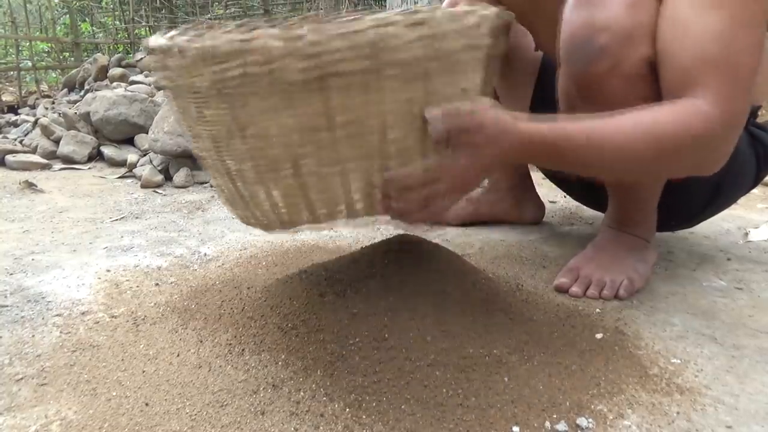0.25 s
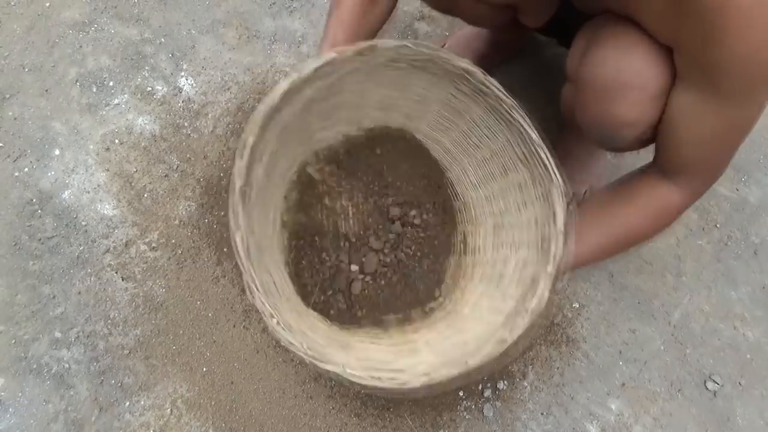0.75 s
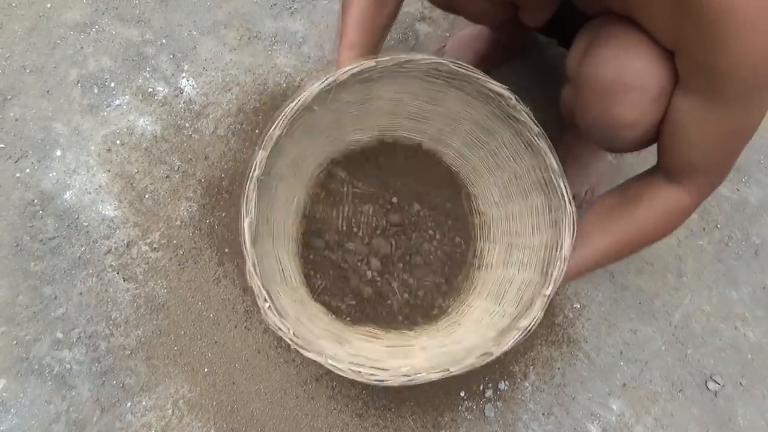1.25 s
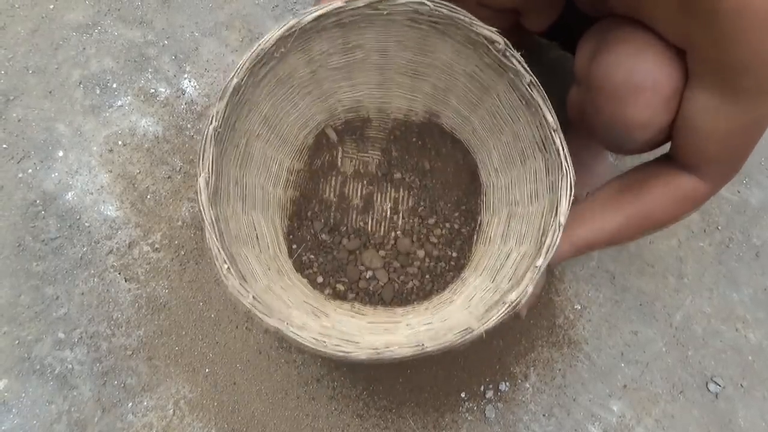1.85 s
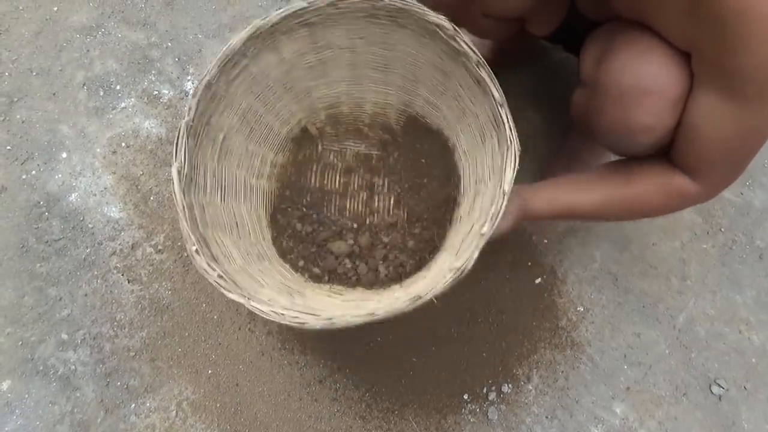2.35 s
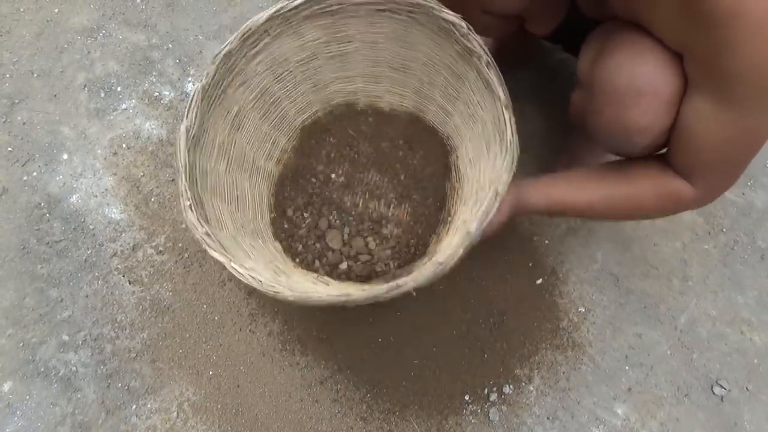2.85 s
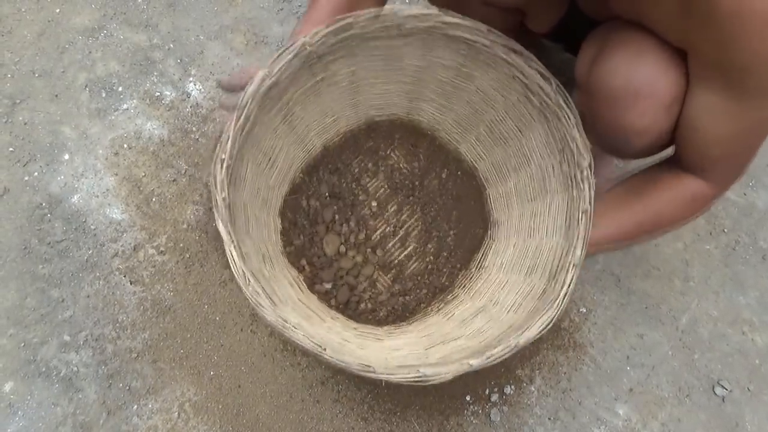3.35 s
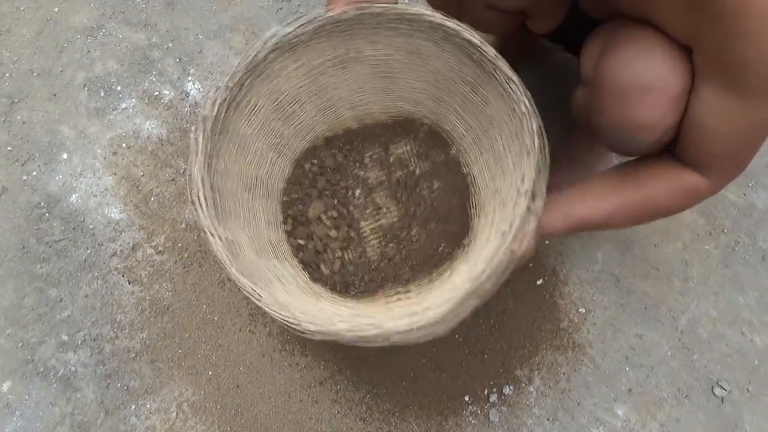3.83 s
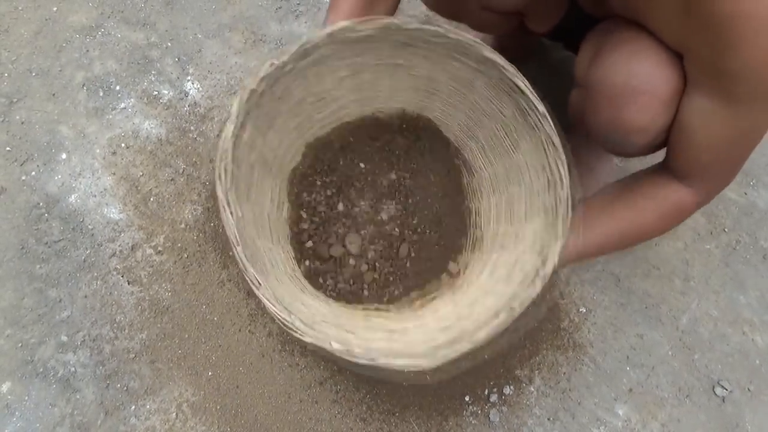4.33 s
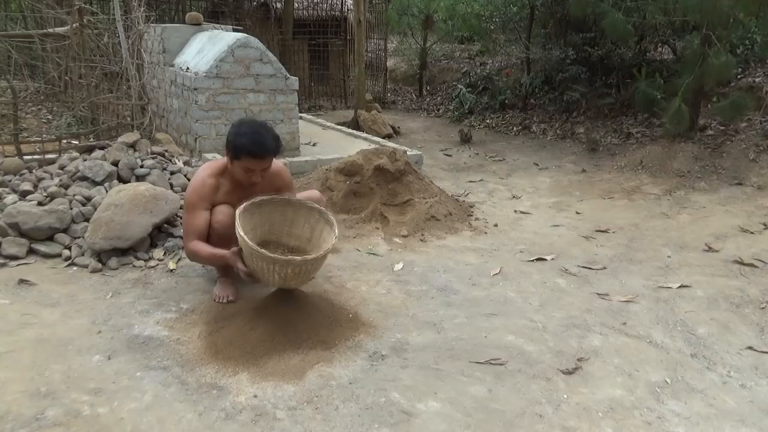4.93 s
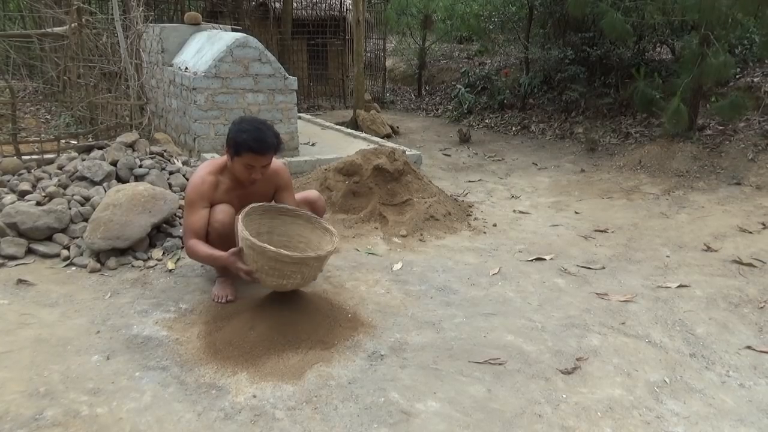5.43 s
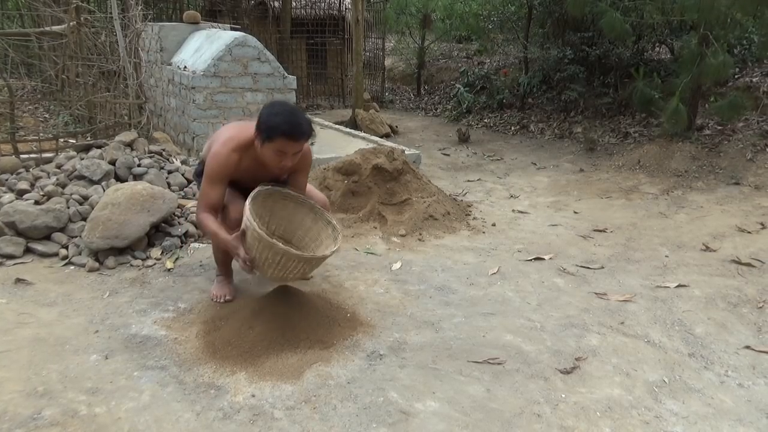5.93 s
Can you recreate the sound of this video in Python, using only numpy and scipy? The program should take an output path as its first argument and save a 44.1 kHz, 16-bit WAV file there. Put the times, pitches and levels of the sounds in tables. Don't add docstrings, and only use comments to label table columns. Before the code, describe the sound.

Brisk back-and-forth sifting of gritty sand through a cane basket, close and bright, pausing for hand slaps, then fainter distant shakes.

```python
import sys
import numpy as np
from scipy import signal
from scipy.fft import rfft, irfft, next_fast_len
from scipy.io import wavfile
from scipy.ndimage import uniform_filter1d, map_coordinates

SR = 44100
rng = np.random.default_rng(int(sys.argv[2]) if len(sys.argv) > 2 else 0)


def unload_audio(sound):
    columns = np.transpose(np.atleast_2d(sound))
    steps = np.round(np.clip(columns, -1, 1) * 32767)
    wavfile.write(sys.argv[1], SR, steps.astype(np.int16))


def makeup_ratio(level_db):
    decades = np.asarray(level_db, float) / 20
    return 10 ** decades


N = 272538


def unit(x):
    return x / np.sqrt(np.mean(x ** 2) + 1e-20)


def along(points, hz):
    f, v = np.transpose(points)
    return np.interp(np.log(hz + 1), np.log(f + 1), v)


def curves(rows):
    s, *cols = np.transpose(rows)
    return [np.interp(np.arange(N) / SR, s, c) for c in cols]


def wobble(rate):
    knots = rng.standard_normal(int(N * rate / SR) + 4)
    return map_coordinates(knots, [np.arange(N) * rate / SR])


def filtered(x, response, keep_power=True):
    m = next_fast_len(N + SR // 4)
    gain = response(np.fft.rfftfreq(m, 1 / SR))
    if keep_power:
        gain = gain / np.sqrt(np.mean(np.abs(gain) ** 2, -1, keepdims=True))
    return irfft(rfft(x, m) * gain, m)[..., :N]


def patches(x, size, bins, frames, gain):
    z = signal.stft(x, nperseg=size)[2]
    field = rng.standard_normal(z.shape)
    field = uniform_filter1d(field, size=bins, axis=0)
    field = uniform_filter1d(field, size=frames, axis=1)
    return signal.istft(z * gain(unit(field)), nperseg=size)[1][:N]


def grains(per_s, spread_db, clump_db, clump_rate, ring_db):
    when, sign, size = rng.random((3, int(per_s * N / SR)))
    strength = np.sign(sign - .5) * makeup_ratio(-spread_db * np.log(1 - .98 * size))
    hits = np.bincount((when * N).astype(int), strength, N)
    hits = hits * makeup_ratio(clump_db * wobble(clump_rate))
    return unit(patches(hits, size=2048, bins=2, frames=2, gain=lambda field: makeup_ratio(ring_db * field)))


def load():
    sand, bowl, grit = flows()
    return sand_hiss(sand) + grit_scratch(grit) + makeup_ratio(-0.48) * bowl_drum(bowl) + makeup_ratio(-8) * tumbling(bowl)


def sand_hiss(flow):
    # (frequency [Hz], density [dB per Hz])
    sand_colour = [(2650, -31.5), (4500, -11), (7000, -7.5), (8990, 0), (10100, 0.5), (14100, -10.5),
                   (15600, -18)]
    return filtered(flow * grains(50000, 2.4, 1.1, 150, 2.1), lambda hz: makeup_ratio(along(sand_colour, hz)))


def grit_scratch(flow):
    # (frequency [Hz], density [dB per Hz])
    grit_colour = [(820, -23), (1500, -1.5), (2800, -1.5), (3120, -5), (3890, -2), (5200, -2.5),
                   (6760, -3.5), (11400, -120)]
    return filtered(flow * grains(20000, 2.6, 0.99, 60, 1.6), lambda hz: makeup_ratio(along(grit_colour, hz)))


def bowl_drum(flow):
    # (centre [Hz], width [Hz], level [dB])
    bowl_modes = [(170, 76, -7.5), (266, 174, -7.5), (512, 192, -1.5), (800, 307, -1), (1033, 270, -1.5),
                  (1400, 254, -5.5)]

    def response(f):
        total = 0
        for k, (centre, width, db) in enumerate(bowl_modes):
            total = total + (-1) ** k * makeup_ratio(db) * 1j * f * width / (centre * centre - f * f + 1j * f * width)
        return total / (1 + (f / 1900) ** 4)

    return filtered(flow * grains(9000, 1.8, 0.92, 30, 1.4), response)


def tumbling(flow, count=1500):
    when, tone, size = rng.random((count, 3)).T[:, :, None]
    step = np.arange(400)
    hz = 900 * 6 ** tone
    cycles = step * hz / SR
    decay = makeup_ratio(-4 * np.log(1 - .97 * size) - 60 * cycles / 11)
    rings = decay * np.minimum(cycles, 1) * np.sin(2 * np.pi * cycles)
    start = (when * N).astype(int)
    place = (start + step).ravel()
    steady = np.bincount(place, rings.ravel())
    return np.bincount(place, (flow[start] * rings).ravel(), N)[:N] / np.std(steady)


def flows():
    return np.sqrt(shaking() + jolts() + trickles())


def shaking():
    # (time [s], flow left at the reversal [dB], flow in the stroke that follows [dB])
    opening = [
        (-0.12, -44, -35),
        (-0.01, -42.5, -39),
        (0.111, -53, -39.5),
        (0.229, -46, -37),
        (0.343, -53, -40),
        (0.456, -44.5, -41),
        (0.57, -45, -50),
    ]
    first = [
        (0.49, -24, -30.5),
        (0.592, -38, -32),
        (0.716, -44.5, -29.5),
        (0.85, -34, -30.5),
        (0.954, -43.5, -28),
        (1.085, -33, -30.5),
        (1.19, -37.5, -28.5),
        (1.315, -33, -31.5),
        (1.425, -40.5, -33),
        (1.528, -42, -54),
    ]
    second = [
        (2.155, -63, -36),
        (2.265, -36.5, -34),
        (2.39, -36, -29.5),
        (2.52, -32.5, -31),
        (2.639, -37.5, -30.5),
        (2.772, -35.5, -32),
        (2.873, -40.5, -29.5),
        (3.01, -34, -31.5),
        (3.117, -38.5, -37.5),
        (3.213, -50, -43),
    ]
    third = [
        (3.835, -62.5, -39),
        (3.958, -43.5, -33),
        (4.085, -33.5, -32),
        (4.19, -32.5, -29),
        (4.316, -36, -29),
        (4.42, -33.5, -30),
        (4.54, -36, -31),
        (4.64, -35.5, -32),
        (4.765, -38, -33.5),
        (4.857, -44, -39),
    ]
    far = [
        (5.372, -66, -52),
        (5.482, -61.5, -48),
        (5.597, -60.5, -57.5),
        (5.665, -61.5, -53),
        (5.785, -61, -60),
    ]
    peakedness = [1.8, 1.2, 1.2, 1.2, 1.5]
    # (heard from [s], heard to [s], bowl re hiss [dB], grit re hiss [dB],
    # lateness of the fastest slide [0-1])
    rattle = [
        (0, .5235, -12.5, -8.5, .52),
        (.5235, 1.7, -11, -10, 0.49),
        (2, 3.4, -13.5, -10, 0.54),
        (3.7, 4.938, -14, -10, 0.58),
        (5.2, 5.95, -14.5, -10, 0.61),
    ]
    bouts = zip([opening, first, second, third, far], peakedness, rattle)
    return sum(bout(turns, fullness, *settings) for turns, fullness, settings in bouts)


def bout(turns, fullness, start, end, bowl_db, grit_db, late):
    back_bowl_db, back_grit_db = 1, 1
    back_later = 0.025
    coarse_evenness = 0.17
    settle_db_per_s = 295
    t = np.arange(N) / SR
    s, lull_db, stroke_db = np.transpose(turns)
    place = np.interp(t, s, np.arange(len(s)))
    stroke = place.astype(int)
    back = stroke % 2
    peak = np.clip(late + back_later * back, .2, .8)
    warp = np.log(.5) / np.log(peak)
    speed = np.sin(np.pi * (place - stroke) ** warp) ** fullness
    outside = np.maximum(t - s[-1], 0) + np.maximum(s[0] - t, 0)
    carried = makeup_ratio(np.interp(t, s, lull_db) - settle_db_per_s * outside)
    flow = carried + np.maximum(makeup_ratio(stroke_db[stroke]) - carried, 0) * speed
    even_db = coarse_evenness * (stroke_db[:-1].mean() - stroke_db[np.minimum(stroke, len(s) - 2)])
    bowl_db = bowl_db + back_bowl_db * back + even_db
    grit_db = grit_db + back_grit_db * back + even_db / 2
    heard = (t >= start) & (t < end)
    return heard * (flow * makeup_ratio([0 * back, bowl_db, grit_db])) ** 2


def jolts():
    # (time [s], hiss [dB], fall [ms], coarse bits [dB])
    jumps = [(1.7274, -33, 47, 1), (1.734, -31, 11, 4.5), (1.901, -49, 3, -1), (1.9505, -32.5, 18, 0),
             (1.962, -28.5, 6, -4), (3.413, -32, 37, -1), (3.439, -28, 15, -0.5), (3.668, -38, 10, 4),
             (3.675, -35.5, 6.4, 1.5), (5.157, -54.5, 20, 0), (5.18, -43, 9, -0.5), (5.986, -50, 5, -7)]
    rise_ms = 3.1
    rows = [(s, db, rise_ms, fall_ms, coarse_db) for s, db, fall_ms, coarse_db in jumps]
    return swells(rows, bowl_db=-13, grit_db=-9)


def trickles():
    # (time [s], hiss [dB], half width [ms], coarse bits [dB])
    slumps = [(0.632, -41, 20, 9), (1.585, -54.5, 15.6, -3), (1.655, -66, 10, 0), (1.8, -47.5, 31, 5),
              (1.86, -58, 20, 6), (1.99, -50.5, 28, 2.5), (2.09, -59, 80, -1), (3.288, -53, 29, 2.5),
              (3.36, -68, 10, 0), (3.51, -47.5, 37, 1), (3.55, -55, 12, -6), (3.698, -42.5, 23, 2),
              (3.774, -54.5, 35, -2), (4.062, -34, 12, 0), (4.82, -45, 25, 9), (4.88, -51, 15, 2),
              (4.913, -44.5, 10.8, -8), (4.98, -62, 17, -8), (5.023, -66, 34, -14), (5.205, -59.5, 43, -1),
              (5.325, -65, 25, -6), (5.83, -62.5, 40, 1), (5.89, -63, 24, -1), (5.95, -68, 40, -1),
              (6.04, -57.5, 29, 0), (6.127, -58.5, 29, 0.5)]
    rise_over_fall = 0.77
    rows = [(s, db, rise_over_fall * ms, ms, coarse_db) for s, db, ms, coarse_db in slumps]
    return swells(rows, bowl_db=-12.5, grit_db=-9)


def swells(rows, bowl_db, grit_db):
    power = np.zeros((3, N))
    for s, db, rise_ms, fall_ms, coarse_db in rows:
        near = np.arange(max(int((s - .4) * SR), 0), min(int((s + .4) * SR), N))
        late_ms = 1000 * (near / SR - s)
        distance = np.where(late_ms < 0, -late_ms / max(rise_ms, 1), late_ms / max(fall_ms, 1))
        swell_db = db - 6 * distance ** 1.5
        power[:, near] += makeup_ratio(swell_db + [[0], [bowl_db + coarse_db], [grit_db + coarse_db]]) ** 2
    return power


def ringing(rows, gain_db=0, onset_s=None):
    out, t = np.zeros(N + SR), np.arange(SR // 5) / SR
    for s, db, hz, t60 in rows:
        tone = makeup_ratio(db + gain_db - 60 * t / t60) * np.sin(2 * np.pi * hz * t)
        if onset_s:
            tone = tone * (1 - np.exp(-t / onset_s))
        out[round(s * SR):][:len(t)] += tone
    return out[:N]


def slaps():
    # (time [s], peak [dB], frequency [Hz], t60 [s])
    hand = [(1.733, -31, 201, 0.039), (1.747, -29.5, 420, 0.028), (1.751, -36, 150, 0.026),
            (1.95, -46, 330, .03), (1.961, -35, 177, 0.032), (3.412, -44, 170, 0.027),
            (3.424, -42, 211, 0.033), (3.436, -33.5, 170, 0.034), (3.435, -35.5, 373, 0.028),
            (3.666, -38, 188, .035), (3.675, -35, 330, 0.023), (5.177, -50, 190, .035),
            (5.178, -53, 330, 0.033)]
    return ringing(hand, gain_db=4, onset_s=0.0015)


def pebbles():
    # (time [s], peak [dB], frequency [Hz], t60 [s])
    stones = [(.917, -30, 10400, .004), (1.8, -39, 1500, 0.018), (2.192, -35, 9160, .004),
              (2.48, -26, 8800, .004), (2.487, -30, 10000, .005), (3.417, -16, 9800, .004),
              (3.676, -18, 9700, 0.0037), (6.021, -59, 1795, .05), (6.021, -64, 1400, .04),
              (6.022, -61, 2600, .03), (6.031, -52, 9500, .006), (6.12, -66, 303, 0.6)]
    return ringing(stones)


def rim_rattle():
    # (time [s], peak [dB], frequency [Hz], t60 [s])
    cane = [(1.725, -32.5, 850, 0.032), (1.733, -33, 970, .025), (1.747, -38, 520, 0.033),
            (1.9005, -44, 3550, 0.015), (1.9005, -47, 4900, .01), (1.9005, -37, 10380, .008),
            (3.413, -37, 1810, .015), (3.436, -38, 800, 0.018), (3.447, -39, 934, .03),
            (3.676, -36, 1990, 0.012), (5.156, -48, 9500, .008), (5.177, -41, 8540, .01),
            (5.18, -57, 800, .02), (5.985, -53, 3300, .012)]
    return ringing(cane)


def squeak():
    # (from [s], to [s], frequency [Hz], level [dB])
    start, end, hz, db = (1.868, 1.9, 11600, -60)
    out, n = np.zeros(N), int((end - start) * SR)
    tone = np.sin(2 * np.pi * hz * np.arange(n) / SR)
    out[round(start * SR):][:n] = makeup_ratio(db) * np.hanning(n) ** .5 * tone
    return out


def strays():
    # (time [s], level [dB], length [s])
    side_knocks = [
        (1.799, -53, 0.028),
        (2.548, -51, 0.029),
        (4.496, -52, 0.037),
    ]
    # (frequency [Hz], density [dB per Hz])
    knock_colour = [(200, -30), (500, -4), (2000, 0), (3500, -7), (5000, -40)]
    t = np.arange(N) / SR
    puffs = sum(makeup_ratio(db - 6 * ((t - s) / length * 2) ** 2) for s, db, length in side_knocks)
    return puffs * unit(filtered(rng.standard_normal(N), lambda hz: makeup_ratio(along(knock_colour, hz))))


def wind():
    # (time [s], rumble [dB], centre [Hz])
    gusts = [(0.05, -69, 48.6), (0.42, -72, 47.6), (0.55, -63, 48), (0.98, -64, 51.2), (1.77, -62.5, 51.8),
             (2.35, -76, 49), (2.95, -72, 47.8), (3.2, -68, 35), (3.84, -66, 34.2), (4.15, -75, 35),
             (4.28, -66, 38), (4.87, -60, 32.9), (5.03, -76, 33.8), (5.5, -78, 36), (5.75, -70, 56),
             (6.18, -79, 54.3)]
    db, hz = curves(gusts)
    phase = 2 * np.pi * np.cumsum(hz + 7 * wobble(25)) / SR
    return makeup_ratio(db + 2.0 * wobble(17)) * np.sqrt(2) * np.sin(phase)


def insect():
    # (time [s], level [dB])
    trill = [(0, -82), (4.9, -78), (5.15, -89), (6.18, -86)]
    db, = curves(trill)
    band = filtered(rng.standard_normal(N), lambda hz: np.exp(-((hz - 4500) / 120) ** 2))
    return makeup_ratio(db) * unit(band) * makeup_ratio([[1.5], [-4]])


def yard():
    # (frequency [Hz], density [dB per Hz])
    hush_colour = [(22, -8.5), (156, -2.5), (800, -12), (1300, -15), (6240, -23), (9100, -18), (11500, -28),
                   (15600, -37)]
    # (time [s], level [dB])
    hush_level = [(0, -61.5), (4.9, -63.5), (5.3, -69), (6.18, -66)]
    # (frequency [Hz], correlation [-1 to 1])
    likeness = [(60, 0.98), (130, 1), (290, 0.84), (640, 0.5), (1410, 0.31), (3100, 0.47), (6820, 0.73),
                (15000, 0.95)]

    def response(hz):
        turn = np.arccos(np.clip(along(likeness, hz), -1, 1)) / 2
        return makeup_ratio(along(hush_colour, hz)) * [np.cos(turn), np.sin(turn)]

    air = rng.standard_normal((2, N)) * makeup_ratio(1.4 * wobble(7))
    mid, side = filtered(air, response, False)
    return makeup_ratio(curves(hush_level)[0]) * unit(np.array([mid + side, mid - side]))


def scene():
    # (time [s], extra scatter [dB], left-right lean [dB], dullness [0-1])
    distance = [(0, 6, -0.5, 0.4), (.5, -2, 1, 0.4), (.53, 0.5, -0.5, 0.08), (4.92, 5, 0, 0.08),
                (5.2, 6, 1.2, 0.24), (6.18, 9, 0.7, 0.5)]
    # (frequency [Hz], level [dB])
    spread = [(60, -45), (250, -26), (1000, -33), (4000, -27), (6500, -27.5), (8500, -27.5), (10500, -36),
              (15000, -35)]
    scatter_db, lean_db, dull = curves(distance)
    basket = load() + slaps() + pebbles() + rim_rattle() + squeak()
    treble = filtered(basket, lambda hz: 1 / (1 + (11500 / (hz + 1)) ** 8), False)
    basket = basket - np.clip(dull, 0, 1) * treble
    aside = patches(basket, size=512, bins=8, frames=5, gain=lambda field: field)
    aside = makeup_ratio(scatter_db) * filtered(aside, lambda hz: makeup_ratio(along(spread, hz)), False) + strays()
    ports = np.array([basket + aside, basket - aside]) + yard() + insect()
    return ports * makeup_ratio([lean_db / 2, -lean_db / 2]) + wind()


def low_pass(x):
    return signal.sosfilt(signal.butter(12, 16360, fs=SR, output="sos"), x)


def record(dry):
    top_hz = 15890
    mix = filtered(dry, lambda hz: 1. * (hz < top_hz), False)
    return low_pass(mix)


dry = scene()
out = record(dry)
unload_audio(out)
```